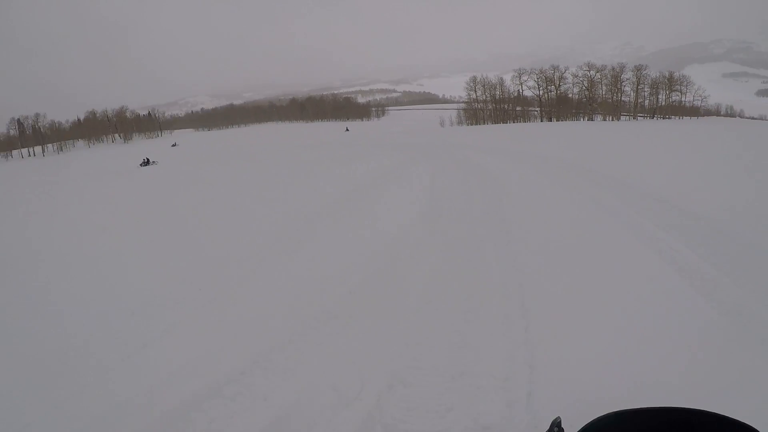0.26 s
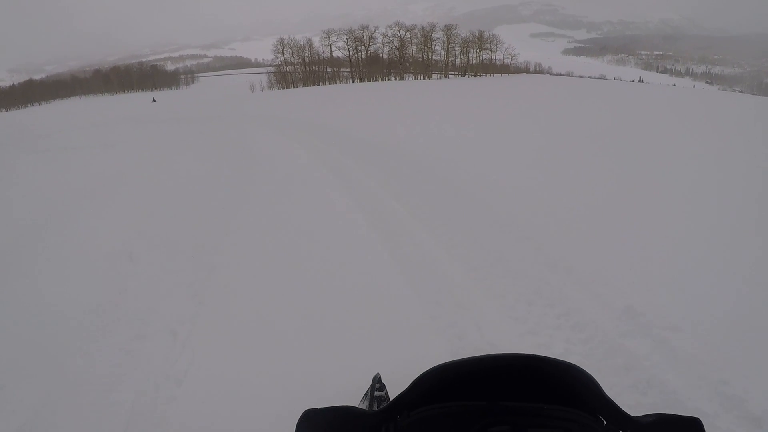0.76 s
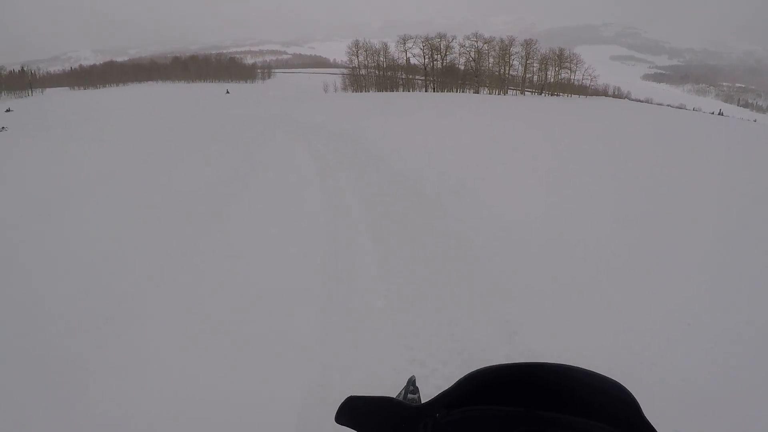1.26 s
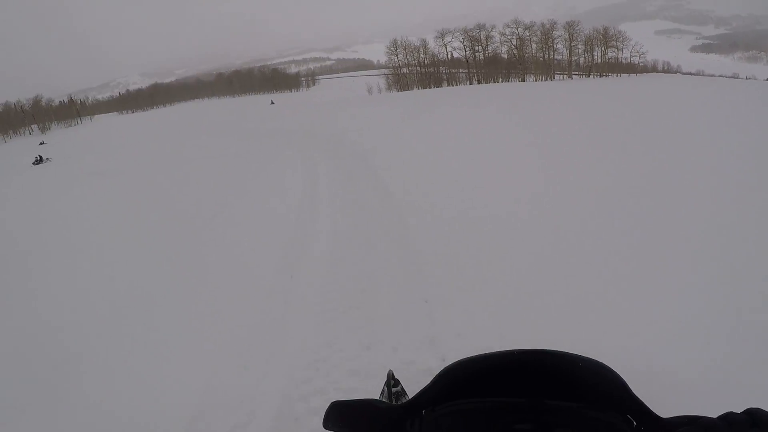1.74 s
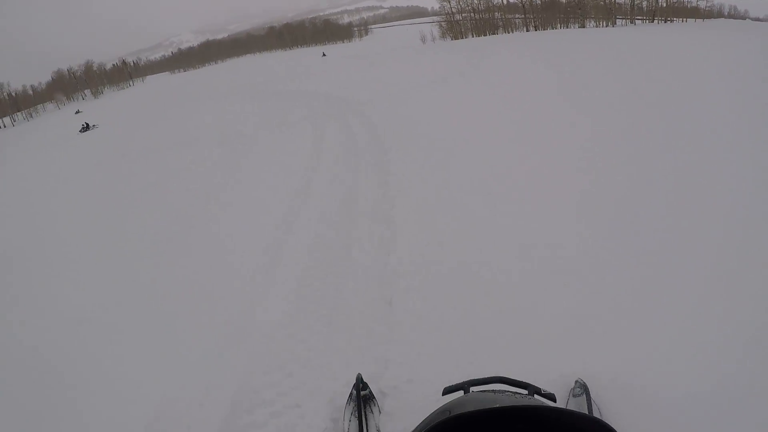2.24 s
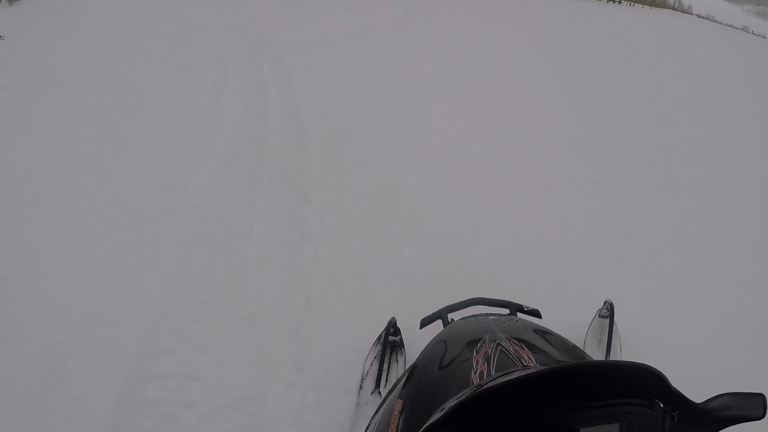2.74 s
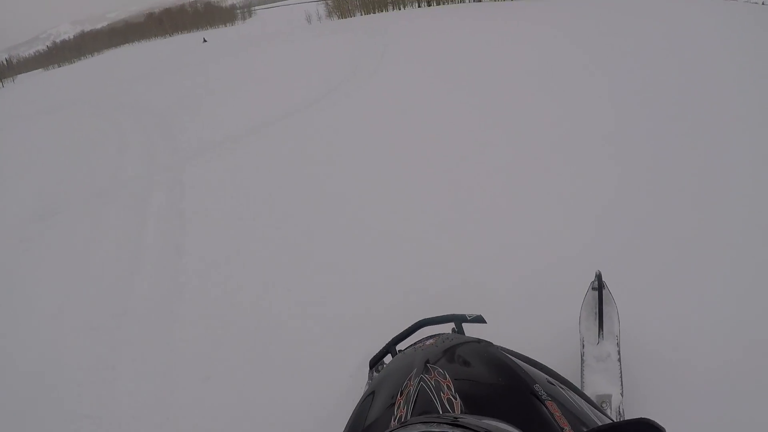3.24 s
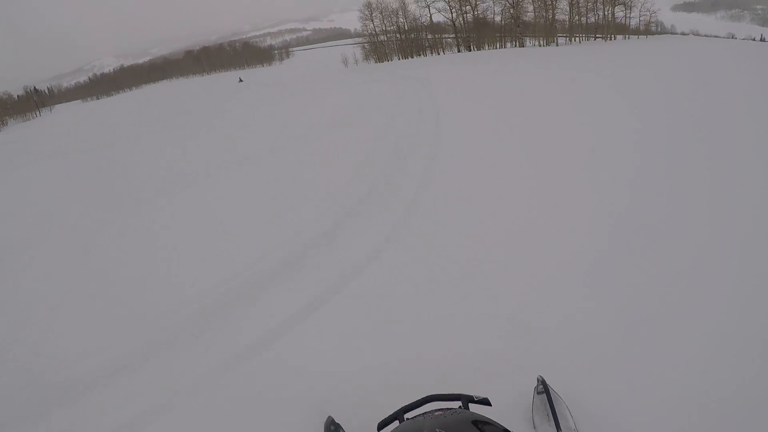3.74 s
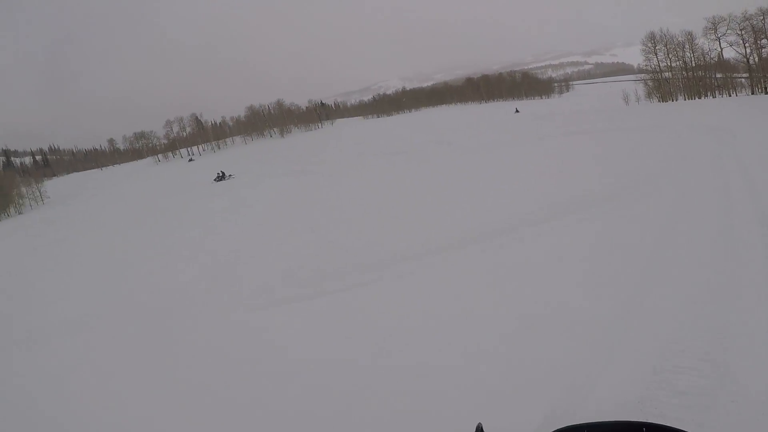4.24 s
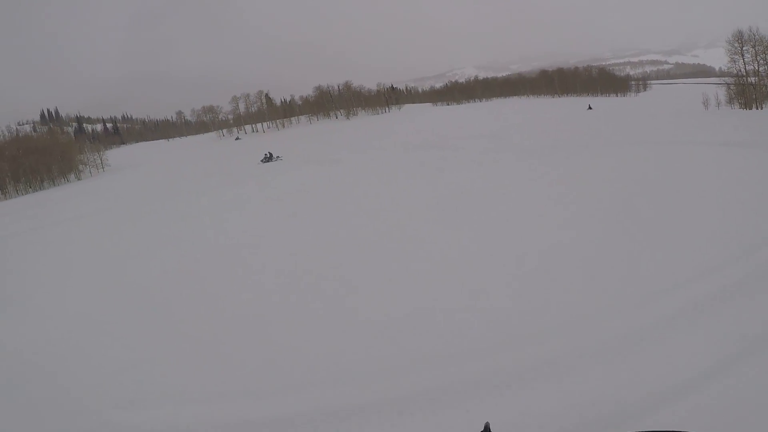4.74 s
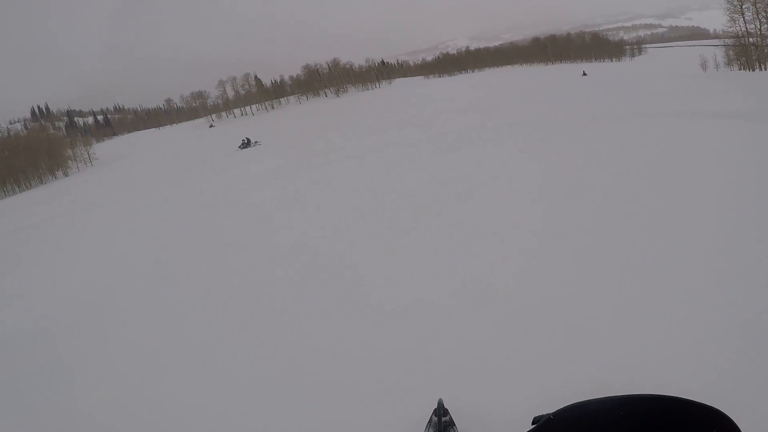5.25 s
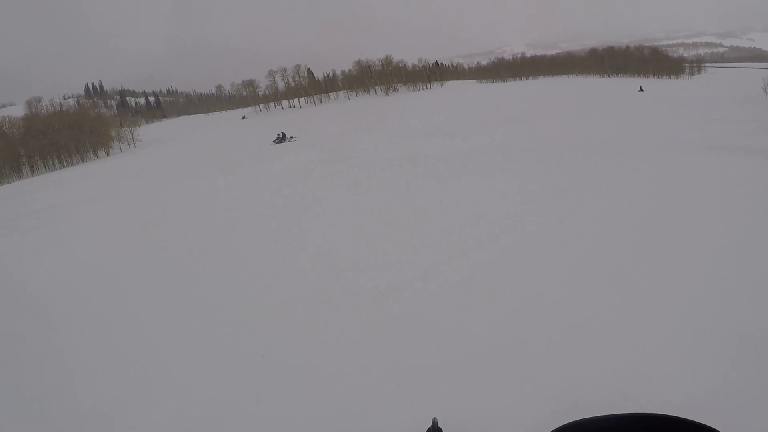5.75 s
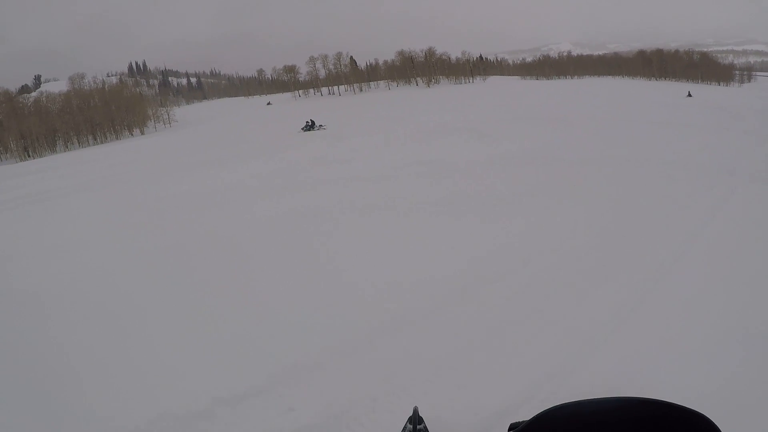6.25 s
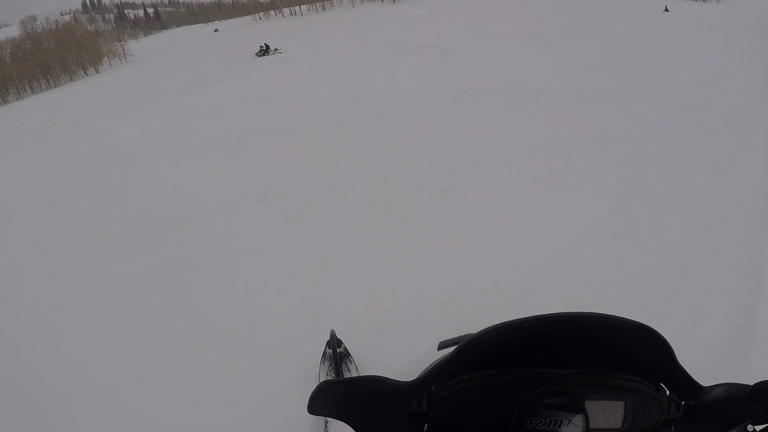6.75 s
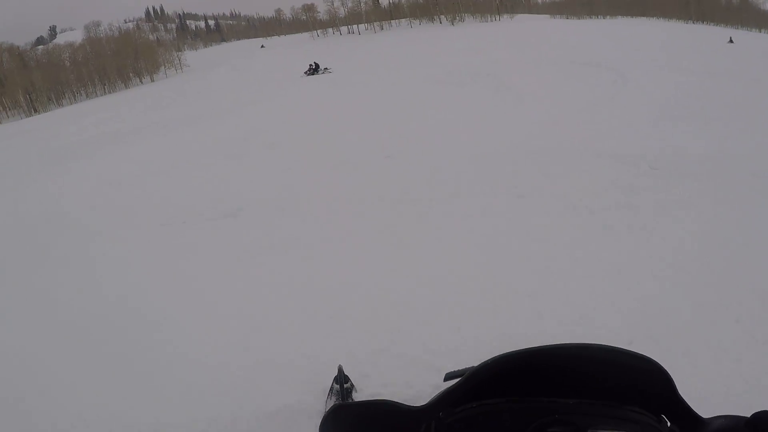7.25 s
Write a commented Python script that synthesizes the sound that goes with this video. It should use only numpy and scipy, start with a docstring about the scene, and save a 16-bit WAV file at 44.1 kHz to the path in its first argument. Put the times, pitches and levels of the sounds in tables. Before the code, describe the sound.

Deep, uneven chugging from a snowmobile engine sits over track clatter, snow hiss and a rumble of wind, all close to a microphone on the rider outdoors. The throttle opens and the pitch shoots up to a bright, buzzing rasp with sizzling spray. Then the revs collapse with a few soft pops, and after a brief lull the engine builds back to an even, low drone.

```python
"""Snowmobile ride across a snowy field

A two-stroke twin heard close up, from two microphone ports at the rider's helmet. It burbles at part
throttle, clears into a rasping full-throttle climb, sputters as the rider lets off, then settles to a
cruise. The firings ring pipe and silencer, crank harmonics sweep through the hood's resonances, and
skis and track hiss through the snow over a rumble of wind. After the climb the image narrows to mono."""
import sys
import numpy as np
from scipy import signal
from scipy.fft import rfft, irfft
from scipy.io import wavfile
from scipy.ndimage import uniform_filter1d, minimum_filter1d

SR = 44100
rng = np.random.default_rng(int(sys.argv[2]) if len(sys.argv) > 2 else 0)


def persist_wave(psi):
    """Save psi, clipped to +-1, as 16-bit WAV."""
    counts = np.round(np.clip(psi, -1, 1) * 32767).astype(np.int16)
    wavfile.write(sys.argv[1], SR, np.atleast_2d(counts).T)


N = 330750
TIME = np.arange(N) / SR
FREQS = np.fft.rfftfreq(N, 1 / SR)
CRUISE_S = 5.6

# strong and weak firings alternate: time_s, cycles_per_firing, regularity (0-1), silencer_ring_db
UNEVEN_FIRING = [(0, 0.23, 0.06, -1), (1.25, 0.2, 0.39, -0.5), (1.7, 0.29, 0.77, 6), (2.25, 0.25, 0.6, 6),
                 (2.75, 0.54, 0.99, -6), (3.15, .26, 0.43, -20), (3.6, 0.24, 0, 4.5),
                 (4.1, 0.27, 0.2, -28.5), (4.65, 0.28, 0.7, -7), (6, 0.38, 0.07, 0), (7.5, 0.41, 0.4, -5)]
# bunches of firings boom in the pipe under light load: centre_s, half_length_s, pitch_hz, level_db
PIPE_BOOMS = [(0.524, 0.019, 132, -8.8), (0.593, 0.015, 125, -8), (0.616, .014, 120.6, -11.5),
              (0.704, 0.012, 119, -7.5), (0.777, .018, 127.7, -10.5), (0.842, 0.009, 123.5, -6.5),
              (0.874, 0.017, 119, -14), (0.908, 0.015, 122, -10.5), (0.952, 0.021, 119, -10),
              (1.012, 0.018, 125.7, -9), (1.073, .022, 127.3, -9), (1.131, 0.012, 128, -6),
              (1.208, 0.011, 116.3, -7.5), (1.231, .014, 121.7, -9), (1.286, 0.012, 128, -5.5),
              (4.369, 0.0087, 98, -11), (4.446, 0.016, 119.3, -18.5), (4.551, 0.02, 104, -14.5),
              (4.643, 0.0086, 117.7, -11.5), (4.705, .022, 119, -12), (4.762, .019, 133.6, -17),
              (4.831, .019, 124.7, -11.5), (4.884, 0.015, 108, -8.5), (4.95, 0.013, 109.7, -12),
              (5.025, 0.019, 117, -10), (5.076, 0.011, 123.5, -11), (5.12, 0.024, 109.7, -9),
              (5.198, .015, 110.7, -7), (5.256, 0.011, 110, -8), (5.301, 0.012, 117.4, -7.5),
              (5.346, 0.022, 119.4, -11.5), (5.42, 0.035, 126.4, -15), (5.497, .015, 125, -9)]


def amp(db):
    """Decibels to gain."""
    return 10 ** (np.asarray(db) / 20)


def unit(x):
    """Scales to rms 1; a stereo pair by its mid signal."""
    return x / np.sqrt(np.mean(np.atleast_2d(x).mean(0) ** 2) + 1e-20)


def curves(rows):
    """Each column of a timed table at every sample."""
    times, *columns = np.transpose(rows)
    return [np.interp(TIME, times, column) for column in columns]


def read(points, hz):
    """Looks up a spectrum table on a log-frequency axis."""
    freqs, values = np.transpose(points)
    return np.interp(np.log(hz + 1), np.log(freqs + 1), values)


def ramp(start_s, length_s):
    """Rises from 0 to 1 and stays there."""
    return np.clip((TIME - start_s) / length_s, 0, 1)


def bell(x, centre, width):
    """Bell curve, down to 1/e one width from its centre."""
    return np.exp(-((x - centre) / width) ** 2)


def wander(rate):
    """Random drift of rms 1 that changes about rate times a second."""
    knots = rng.standard_normal(8192)
    return unit(np.interp(TIME * rate, np.arange(len(knots)), knots))


def response(modes):
    """Complex response of resonances (centre_hz, width_hz, gain_db) with alternating sign."""
    return sum((-1) ** k * amp(db) * 1j * FREQS * width / (hz ** 2 - FREQS ** 2 + 1j * FREQS * width)
               for k, (hz, width, db) in enumerate(modes))


def lowpass(edge_hz, order):
    """Gain of a smooth low-pass."""
    return 1 / np.sqrt(1 + (FREQS / edge_hz) ** (2 * order))


def ports(spectrum, diffuse=None):
    """A spectrum at the two microphone ports: the left is shaded and late; diffuse sound differs."""
    # shading of the left port: frequency_hz, left_minus_right_db
    shading = [(60, 0.08), (100, -0.5), (170, 0.1), (300, -2.5), (500, -3.5), (860, -8.0), (1460, -9.0),
               (2480, -8.0), (4220, -5.5), (7180, -1.0)]
    # phase between the ports: frequency_hz, left_lead_rad
    phase_lead = [(20, -0.5), (350, 0.65), (600, -2.5), (800, -0.9), (1200, -4.5), (1460, -2.5),
                  (1950, -8.5), (3000, -5.5), (4000, -21.5), (5100, 6), (6000, -8.5), (7300, -8),
                  (14000, -48)]
    # likeness of diffuse sound at the ports: frequency_hz, coherence (0-1)
    coherence = [(30, 0.75), (250, 0.59), (500, 0.27), (1000, 0.22), (2000, 0.59), (4000, 0.37),
                 (8000, 0.73)]
    left = spectrum
    if diffuse is not None:
        alike = read(coherence, FREQS)
        left = alike * spectrum + np.sqrt(1 - alike ** 2) * diffuse
    shade = amp(read(shading, FREQS)) * np.exp(1j * read(phase_lead, FREQS))
    mid_gain = np.maximum(abs(1 + shade) / 2, .5)
    return irfft(np.array([left * shade, spectrum]) / mid_gain, N)


def noise(shape):
    """Stereo noise of rms 1 with a given spectrum."""
    common, diffuse = rfft(rng.standard_normal((2, N))) * amp(read(shape, FREQS))
    return unit(ports(common, diffuse))


def exhaust_note(firings, firing_hz, level_db, lull_gain, after_climb, weak_db=-20):
    """Four firing harmonics coloured by the pipe; the lowest dips at each chug and fades first."""
    # what pipe and silencer let through: frequency_hz, gain_db
    pipe_colour = [(130, 3), (152, 3), (180, -2), (225, -0.5), (264, -4), (295, -4), (360, -8), (394, -5.5),
                   (415, -19.5), (440, -8.5), (460, -11), (490, -24.5), (620, -21), (700, -26.5),
                   (790, -19.5), (1000, -49)]
    ring_db = 0.73 * curves(UNEVEN_FIRING)[2]  # harmonics near the silencer's modes swell with them
    upper_db = level_db + 0.73 * np.maximum(weak_db - level_db, 0) - 2 * after_climb
    fourth_db = upper_db - 6 + 4 * ramp(CRUISE_S, .3)
    gains = (amp(level_db) * lull_gain, amp(upper_db), amp(upper_db), amp(fourth_db))
    tone = np.zeros(N)
    for k, gain in enumerate(gains, 1):
        hz = k * firing_hz
        colour_db = read(pipe_colour, hz) + ring_db * bell(hz, 420, 85)
        tone += gain * amp(colour_db + 0.59 * wander(9)) * np.cos(2 * np.pi * k * firings)
    return ports(rfft(-np.sqrt(2) * tone))


def burble_level(exhaust_db, throttle, surge, after_climb, starved_db=-18):
    """Level of uneven firing in dB: loudest at steady part throttle, dying away with the exhaust."""
    fading_db = 0.64 * np.minimum(exhaust_db - starved_db, 0)
    clearing_db = -10.5 * throttle ** 2 - 4 * np.minimum(abs(surge), 1)
    return -13.5 + fading_db + clearing_db + after_climb - 2 * ramp(CRUISE_S, 0.39)


def skipped_firings(count):
    """Strength of each firing about its mean, rms 1: all even but for one missed in every 3 to 8."""
    missed = np.isin(np.arange(count), np.cumsum(rng.integers(3, 9, count)))
    return unit(missed.mean() - missed)


def burble(firings, level_db, throttle, lull_gain, lead_cycles=0.18, muffle_hz=520):
    """Firings vary in a loose cycle, or skip at cruise; the differences ring pipe and silencer."""
    # pipe resonances: centre_hz, width_hz, gain_db
    pipe_modes = [(50.6, 39, -3.5), (113.4, 64.3, 4), (139.7, 83, -1)]
    # silencer resonances: centre_hz, width_hz, gain_db
    silencer_modes = [(298, 38, -21), (355.7, 22.8, -12), (478, 110, -27)]
    cycle, regularity, ring_db = curves(UNEVEN_FIRING)
    at = np.flatnonzero(np.diff(np.floor(firings + lead_cycles)) > 0)  # just ahead of the exhaust note
    regularity = regularity[at]
    slips, scatter = rng.standard_normal((len(at), 2)).T
    pattern = np.sqrt(2) * np.cos(2 * np.pi * np.cumsum(cycle[at] + 0.0673 * (1 - regularity) * slips))
    strength = np.sqrt(regularity) * pattern + np.sqrt(1 - regularity) * scatter
    strength /= np.sqrt(uniform_filter1d(strength ** 2, size=7) + 1e-3)
    skip_share = 0.8 * ramp(CRUISE_S, 0.16)[at]
    kicks = np.zeros(N)
    kicks[at] = np.sqrt(1 - skip_share) * strength + np.sqrt(skip_share) * skipped_firings(len(at))
    pipe = rfft(kicks * lull_gain * (1 - 0.76 * throttle)) * response(pipe_modes)
    pipe += rfft(kicks * throttle ** 2) * response([(193, 35, -10.5)])  # rings higher at full throttle
    silencer = rfft(kicks * amp(ring_db)) * response(silencer_modes)
    muffling = lowpass(muffle_hz, order=4) * (1 - lowpass(32, order=2))
    return unit(ports((pipe + silencer) * muffling)) * amp(level_db + 6 * throttle ** 2)


def lulls(after_climb, reach_s=0.053):
    """Gain of the deep exhaust: it falls away around each chug, less so after the climb."""
    near_chug = np.max([np.exp(-((TIME - s) / reach_s) ** 4) for s, *_ in PIPE_BOOMS], axis=0)
    depth = np.interp(after_climb, [0, 1], [0.85, 0.3])
    return 1 - depth * near_chug


def chugs(firings, lull_gain):
    """Bunched firings ring the pipe for a few cycles, below the firing rate, filling the lulls."""
    booms = np.zeros(N)
    for centre_s, half_s, hz, db in PIPE_BOOMS:
        cycles = firings[round(centre_s * SR)] + hz * (TIME - centre_s)
        booms += amp(db) * bell(TIME, centre_s, half_s) * np.cos(2 * np.pi * cycles)
    return ports(rfft(-np.sqrt(2) * booms * np.sqrt(1 - lull_gain ** 2)))


def throb(firings, firing_hz, throttle, surge, from_hz=212):
    """At speed one cylinder fires harder, most while the engine pulls: odd crank harmonics sound."""
    crank = np.pi * firings
    tone = np.sin(crank + .25 * wander(40)) + amp(-15) * np.cos(3 * crank) + amp(-16) * np.cos(5 * crank)
    fast = np.clip((firing_hz - from_hz) / 20, 0, 1) * throttle
    level_db = -21.5 + 8 * np.clip(surge, 0, 1) + 1.5 * wander(14)
    return ports(rfft(np.sqrt(2) * tone * fast)) * amp(level_db)


def sputter(blur_rad=0.58):
    """Unburnt fuel pops in the silencer: short, rough puffs, each lower than the last."""
    # pops after the let-off: centre_s, half_length_s, pitch_hz, level_db
    pops = [(3.628, .03, 440, -34.5), (3.726, 0.045, 376.8, -30), (3.779, 0.023, 350, -36.5),
            (3.859, 0.016, 259, -26.5)]
    puffs = np.zeros(N)
    for centre_s, half_s, hz, db in pops:
        phase = 2 * np.pi * hz * TIME + blur_rad * wander(90)
        puffs += amp(db) * bell(TIME, centre_s, half_s) * np.cos(phase)
    return ports(rfft(np.sqrt(2) * puffs))


def rasp(firings, firing_hz, throttle, phases, honk_hz=1080, treble_hz=2400):
    """Crank harmonics sweep through the hood resonances; unequal cylinders add the odd ones."""
    # engine under the hood: time_s, level_db, odd_harmonics_db, treble_db
    balance = [(0, -33.5, -7, -8.5), (.6, -35, -2.5, 0), (1.2, -39.5, 1.5, -0.5), (2.25, -41.5, -2.5, 0),
               (2.5, -37, -2, 9.5), (2.7, -23.5, -2, 3), (3.04, -24.5, -1.5, 5.5), (3.14, -19, -6.5, 3),
               (3.5, -24.5, -10.5, 1.5), (3.57, -33.5, -9, 4.5), (4, -49, 4, 0), (5.3, -40, -0.5, 3.5),
               (6, -39, -1.5, -2), (7.5, -41, 4.5, 4.5)]
    # resonances of casing and hood: centre_hz, width_hz, gain_db
    hood_modes = [(566, 120, -5.5), (757, 31, 8), (1024, 110, 7), (1210, 81, -12.5), (1393, 68, 4),
                  (1780, 250, 2.5), (2570, 570, -9.5), (2840, 170, -5.5), (3240, 330, -16.5),
                  (3750, 64, -6), (3880, 310, -15), (4750, 360, -15.5), (5230, 340, -18.5),
                  (6150, 900, -17)]
    level_db, odd_db, treble_db = curves(balance)
    hood = abs(response(hood_modes)) * lowpass(7200, order=5)
    # the firings lose their even timing while the speed changes fast
    changing = np.minimum(abs(uniform_filter1d(np.gradient(firing_hz) * SR, 3000)) / 170, 2)
    crank = np.pi * (firings + (.002 + .0015 * changing) * wander(110))
    frames = np.arange(0, N, 200)
    # the airbox honks until the engine nears top speed
    pulling = np.clip(changing * throttle * np.minimum((248 - firing_hz) / 25, 1), 0, 1)[frames]
    sound = np.zeros(N)
    for k in range(7, 84):
        hz = k * firing_hz[frames] / 2
        drift = unit(uniform_filter1d(rng.standard_normal(len(frames)), size=20))
        drift_db = 2.5 * drift * np.minimum(hz / treble_hz, 1)  # high harmonics are the least steady
        airbox_db = 4 * pulling * bell(hz, honk_hz, 330)
        colour_db = odd_db[frames] * (k % 2) + treble_db[frames] * (hz > treble_hz)
        gain = np.interp(hz, FREQS, hood) * amp(colour_db + airbox_db + drift_db)
        sound += np.interp(np.arange(N), frames, gain) * np.cos(k * crank + phases[k])
    sound *= 1 + .22 * wander(130)  # no two firings are equally hard
    sound /= np.sqrt(uniform_filter1d(sound ** 2, 8000) + 1e-9)
    return ports(rfft(sound)) * amp(level_db)


def flared(sound):
    """During the climb, single bands of the sound swell or hollow for a moment."""
    # flares: centre_s, half_length_s, centre_hz, width_hz, change_db
    flares = [(2.46, 0.044, 890, 700, 2), (2.727, 0.035, 1080, 350, 3), (2.825, 0.026, 1180, 300, 2.5),
              (2.99, 0.067, 1880, 202, 6.5), (3.01, 0.095, 1020, 450, -7), (3.06, 0.041, 1520, 260, 6.5)]
    spectrum = rfft(sound)
    for centre_s, half_s, hz, width_hz, db in flares:
        band = irfft(spectrum * response([(hz, width_hz, 0)]), N)
        sound = sound + (amp(db) - 1) * bell(TIME, centre_s, half_s) * band
    return sound


def whine(firings, phases):
    """Crank harmonics swell and fade: clean at full load, blurred by the rattling drive at light load."""
    # ringing in exhaust, hood and drive: centre_s, sigma_s, crank_multiple, level_db, blur_rad
    whines = [(0.345, .21, 15, -41.5, 1.1), (0.497, .24, 17, -41.5, 1.1), (.56, 0.16, 21, -34, .7),
              (.55, 0.17, 25, -50.5, 0.94), (1.05, 0.21, 22, -43, 0.94), (2.417, .045, 6, -36, .5),
              (2.529, 0.069, 8, -45, .5), (2.595, 0.12, 3, -35, 0.38), (2.668, 0.03, 12, -28.5, .3),
              (2.68, 0.059, 10, -37.5, .4), (2.847, 0.036, 12, -40.5, 0.43), (2.747, .04, 9, -26, .3),
              (2.845, .04, 11, -37, .4), (2.66, .04, 5, -36.5, .4), (2.926, .07, 5, -33, .4),
              (3.036, 0.031, 11, -34, .2), (3.053, .06, 14, -43, .2), (3.102, .08, 38, -41.5, 0.17),
              (3.247, 0.096, 36, -53, .2), (3.278, 0.065, 30, -41.5, 0.22), (3.3, 0.15, 52, -52, .2),
              (3.355, 0.12, 14, -38.5, 0.11), (5.201, 0.77, 17, -46, 1.1), (5.256, .74, 20, -46.5, 1.2),
              (5.347, 0.35, 25, -45.5, 1.9), (5.746, 0.14, 33, -51, .6), (6.25, 0.78, 21, -45.5, 1.1),
              (6.6, .69, 16, -47, 0.71)]
    tone = np.zeros(N)
    for centre_s, sigma_s, k, db, blur_rad in whines:
        swell = amp(db + 1.2 * wander(25)) * bell(TIME, centre_s, np.sqrt(2) * sigma_s)
        tone += swell * np.cos(k * np.pi * firings + phases[k] + blur_rad * wander(70))
    return ports(rfft(np.sqrt(2) * tone))


def clatter(firings, level_db, throttle, after_climb):
    """Track and clutch clatter yields to intake roar as the throttle opens; both pulse with the firings."""
    # track and clutch at the early pace: frequency_hz, density_db
    slow_track = [(320, -16.5), (550, 2.5), (801, -4), (1080, -4), (1370, -4), (1490, 2), (1590, -8.5),
                  (2070, -10), (2260, -16), (2460, -17.5), (3000, -24.5), (3900, -56.5), (6600, -120)]
    # track at the faster pace after the climb: frequency_hz, density_db
    fast_track = [(320, -38), (550, -2.5), (603, 0), (652, -3), (757, -6), (830, -5), (1130, -5.5),
                  (1200, -5), (1360, -4), (1580, -2.5), (1850, -7), (2000, -5.5), (2480, -11.5),
                  (2640, -21), (3000, -21.5), (3900, -54.5), (6600, -120)]
    # intake roar: frequency_hz, density_db
    intake = [(180, -28), (300, -1), (472, -4.5), (525, 3.5), (721, -3.5), (786, -6.5), (849, -3),
              (1870, -4.5), (2200, -8.5), (3000, -18.5), (3900, -66.5), (6600, -120)]
    track = amp(-1) * np.sqrt(1 - after_climb) * noise(slow_track)
    track += amp(-1.45) * np.sqrt(after_climb) * noise(fast_track)
    blend = (1 - throttle ** 2) * track + amp(-5) * throttle * noise(intake)
    pulse = 1 + 0.12 * np.cos(2 * np.pi * firings)
    return blend * unit(pulse) * amp(level_db + 0.8 * wander(60))


def hiss(firings, level_db, throttle, after_climb):
    """Snow spray and engine hiss: brightest at full throttle, with a sandy glide after it."""
    # hiss before the climb: frequency_hz, density_db
    early_snow = [(1410, -28.5), (2400, 1), (2470, 0), (2710, -7), (2870, -7), (3400, -2.5), (3970, -7),
                  (4550, -9), (5010, -10), (5650, -7.5), (6350, -12), (7630, -21), (9920, -36),
                  (16800, -120)]
    # hiss after the climb: frequency_hz, density_db
    cruise_snow = [(1410, -29), (2400, 0), (2480, -9.5), (2560, -3), (2630, -8.5), (3150, -3), (3780, -4),
                   (4170, 2), (5330, -6), (6080, -7.5), (6930, -26), (7630, -22.5), (9920, -41),
                   (16800, -120)]
    # hiss at full throttle: frequency_hz, density_db
    wide_open = [(1410, -30), (2400, -10.5), (2590, -6), (2750, -14.5), (2960, -2.5), (3040, -2.5),
                 (3450, -4.5), (3820, -6), (4290, -3), (5960, -3.5), (7630, -12.5), (9920, -20.5),
                 (16800, -120)]
    snow = amp(5.5) * np.sqrt(1 - after_climb) * noise(early_snow)
    snow += amp(-1) * np.sqrt(after_climb) * noise(cruise_snow)
    blend = np.sqrt(1 - throttle ** 2) * snow + amp(-4) * throttle * noise(wide_open)
    depth = 0.099 + .3 * throttle ** 4
    pulse = 1 + depth * np.cos(2 * np.pi * firings) + 0.1 * np.cos(np.pi * firings)
    return blend * unit(pulse) * amp(level_db + wander(80))


def fine_spray(firings, firing_hz, hiss_db, throttle, top_hz=265):
    """Fine spray sizzles at full throttle, in spurts at the firing rate; loudest at top speed."""
    # sizzle of the spray: frequency_hz, density_db
    sizzle = [(5000, -67.5), (8000, 1.5), (9000, -4.5), (10500, 1.5), (11500, 2), (12500, 2), (14000, -25)]
    spurts = unit(1 + .7 * np.cos(2 * np.pi * firings))
    level_db = hiss_db - 26 - .09 * (top_hz - firing_hz)
    return noise(sizzle) * spurts * throttle ** 3 * amp(level_db)


def rumble(burble_db, after_climb, gust_db=2):
    """Wind and chassis rumble under the burble and follow its level, stronger at the faster pace."""
    # wind and chassis: frequency_hz, density_db
    wind = [(10, -24.5), (30, -6.5), (60, 2.5), (120, 0.5), (220, -8), (450, -17), (700, -47), (1500, -67)]
    return noise(wind) * amp(burble_db - 6.5 + 3 * after_climb + gust_db * wander(8.2))


def buffet(firing_hz, throttle, gust_db=3, top_hz=260):
    """Air churns at each microphone port separately as the machine gathers speed."""
    colour = abs(response([(135, 570, 0)])) * lowpass(470, order=2)
    air = irfft(rfft(rng.standard_normal((2, N))) * colour, N)
    return unit(air) * (throttle * firing_hz / top_hz) ** 2 * amp(-27 + gust_db * wander(8.4))


def scene():
    """Exhaust, engine, snow and wind at the helmet, following one crankshaft and one throttle."""
    # engine speed through part throttle, climb, let-off and cruise: time_s, firing_hz
    engine_speed = [(0, 153.4), (.13, 154.9), (.45, 144), (.9, 135.6), (1.5, 132.6), (2.27, 131),
                    (2.338, 141.2), (2.398, 156), (2.5, 179.2), (2.566, 189.9), (2.748, 221.6),
                    (2.85, 240.3), (3.018, 261.9), (3.11, 265.4), (3.53, 259.8), (3.61, 225.2),
                    (3.72, 190.6), (3.8, 171.7), (4.15, 152.2), (4.5, 148.1), (5.15, 146.6), (5.7, 148.1),
                    (6.05, 154.3), (6.7, 153.1), (7.5, 151.7)]
    # the rider's throttle: time_s, opening (0-1)
    throttle_moves = [(0, 0.42), (2.27, 0), (2.335, 0.8), (2.45, 0.88), (2.7, 0.85), (3.05, 0.98),
                      (3.51, 0.96), (3.61, 0.7), (3.7, 1), (3.9, 0.4), (4.5, 0.14), (5.4, 0.5), (6, 0.57),
                      (7.5, 0.63)]
    # strength of the exhaust note: time_s, level_db
    exhaust_levels = [(0, -15), (.4, -17.5), (2.22, -22.5), (2.29, -14.5), (2.34, -10), (2.42, -8),
                      (2.55, -10.5), (3.2, -8.5), (3.52, -13), (3.6, -27), (4.1, -41), (4.5, -29),
                      (4.72, -26.5), (5.4, -17.5), (6, -14.5), (7.5, -15.5)]
    # the machine on the snow: time_s, clatter_db, hiss_db
    running_levels = [(0.08, -30.5, -46.5), (0.51, -29.5, -43.5), (1.11, -30.5, -44), (1.61, -32, -49.5),
                      (1.73, -30.5, -47), (2.27, -30.5, -48.5), (2.36, -23, -40.5), (2.62, -22.5, -36.5),
                      (2.82, -22, -32), (3.05, -22.5, -30), (3.18, -24.5, -30), (3.5, -25.5, -38.5),
                      (3.6, -27, -47.5), (3.82, -39, -62), (4.05, -41, -54), (4.61, -37.5, -43),
                      (6.59, -31, -42.5), (7.5, -30.5, -43.5)]
    # the exhaust shifts as the rider leans across the machine: time_s, left_minus_right_db
    rider_lean = [(0, -0.2), (3.3, 0), (3.6, 12), (3.8, 6)]
    firing_hz, = curves(engine_speed)
    throttle, = curves(throttle_moves)
    exhaust_db, = curves(exhaust_levels)
    clatter_db, hiss_db = curves(running_levels)
    lean = amp(np.outer([.5, -.5], curves(rider_lean)[0]))
    after_climb = ramp(3.55, 0.2)
    firings = np.cumsum(firing_hz) / SR  # two to each turn of the crank
    surge = uniform_filter1d(np.gradient(firing_hz) * SR / 230, size=1500)  # 1 = gaining 230 Hz a second
    burble_db = burble_level(exhaust_db, throttle, surge, after_climb)
    lull_gain = lulls(after_climb)
    phases = 2 * np.pi * rng.random(100)
    # as the speed collapses the engine stops firing evenly and its note breaks up
    stumble = .15 * np.clip(-surge * (1 + 1.2 * after_climb), 0, 1) * wander(90)
    exhaust = exhaust_note(firings + stumble, firing_hz, exhaust_db, lull_gain, after_climb)
    exhaust += burble(firings, burble_db, throttle, lull_gain)
    exhaust += throb(firings, firing_hz, throttle, surge) + sputter() + chugs(firings, lull_gain)
    machine = rasp(firings, firing_hz, throttle, phases)
    machine += clatter(firings, clatter_db, throttle, after_climb)
    machine = flared(machine) + whine(firings, phases)
    snow = hiss(firings, hiss_db, throttle, after_climb)
    snow += fine_spray(firings, firing_hz, hiss_db, throttle)
    wind = rumble(burble_db, after_climb) + buffet(firing_hz, throttle)
    return exhaust * lean + machine + snow + wind


def record(dry, merge_s=3.7, merge_db_per_s=37.5, ceiling=.95, edge_hz=13200):
    """The ports merge to mono as the wind picks up; peaks are softly limited and the top is cut off."""
    mid = dry.mean(0)
    width = amp(-merge_db_per_s * np.maximum(TIME - merge_s, 0))
    heard = mid + (dry - mid) * width
    peak = uniform_filter1d(-minimum_filter1d(-abs(heard).max(0), 400), 400)
    limited = heard / (1 + (peak / ceiling) ** 8) ** (1 / 8)
    faded = limited * signal.windows.tukey(N, .001)
    band_limit = signal.firwin(511, edge_hz, window=("kaiser", 9), fs=SR)
    return signal.oaconvolve(faded, band_limit[None], "same")


dry = scene()
out = record(dry)
persist_wave(out)
```